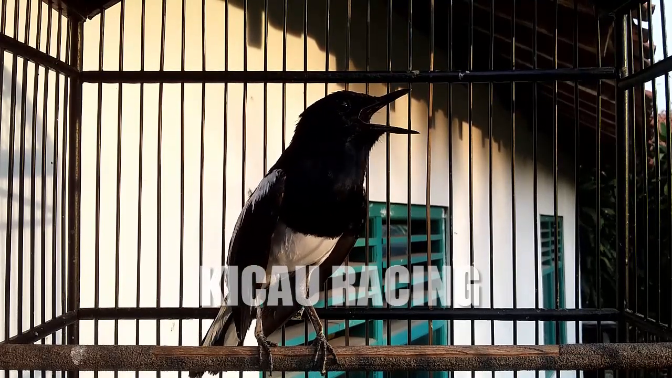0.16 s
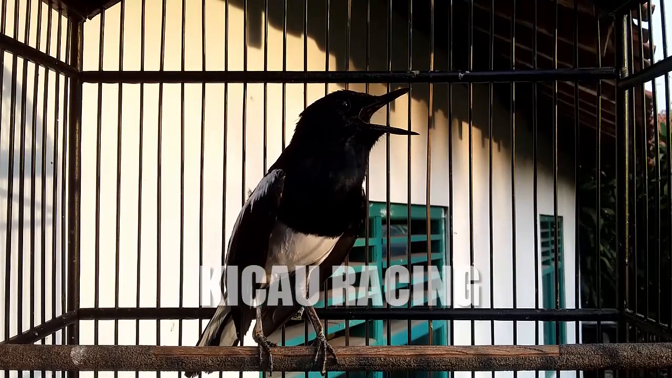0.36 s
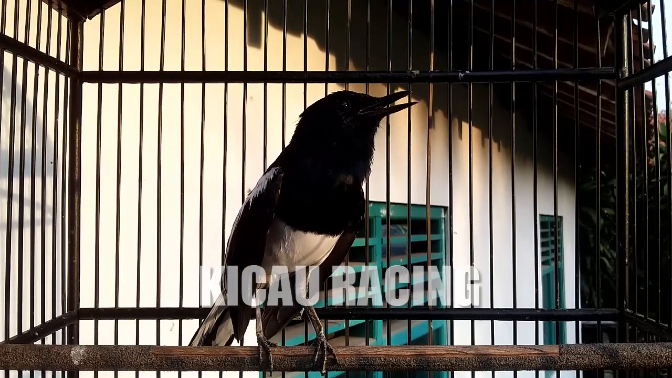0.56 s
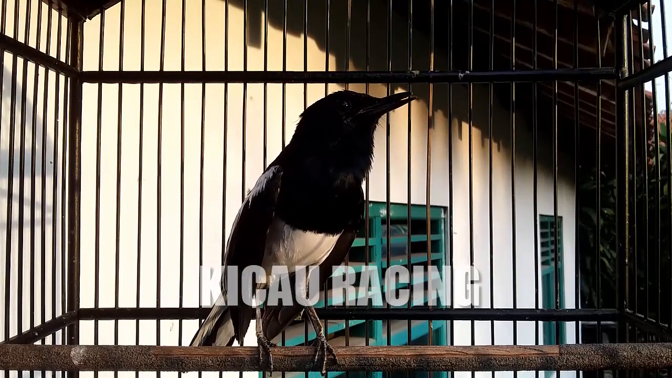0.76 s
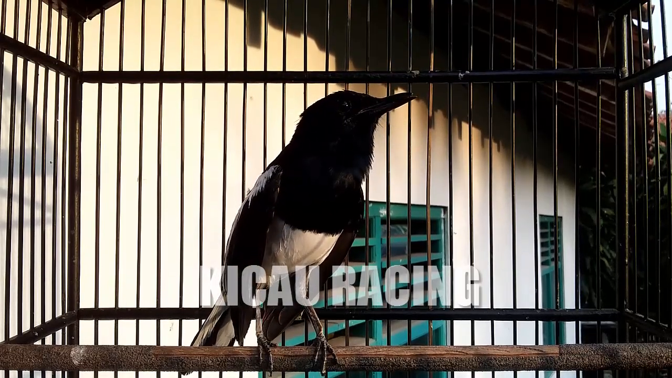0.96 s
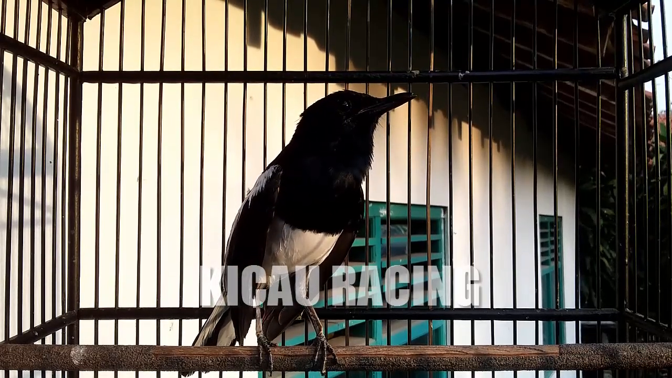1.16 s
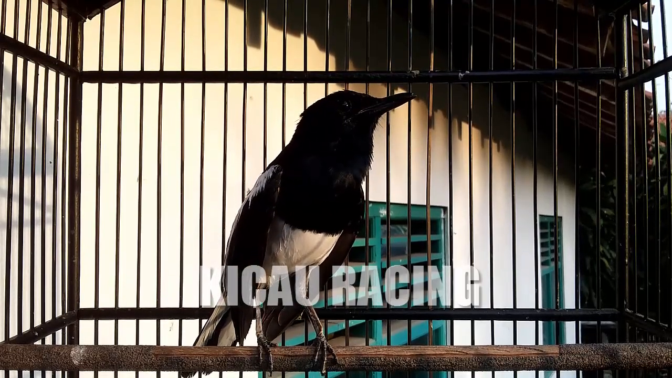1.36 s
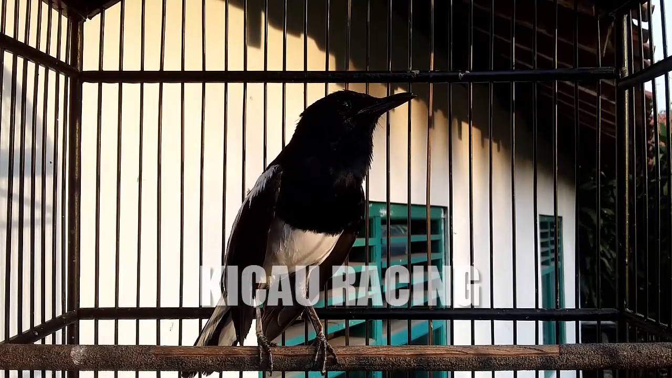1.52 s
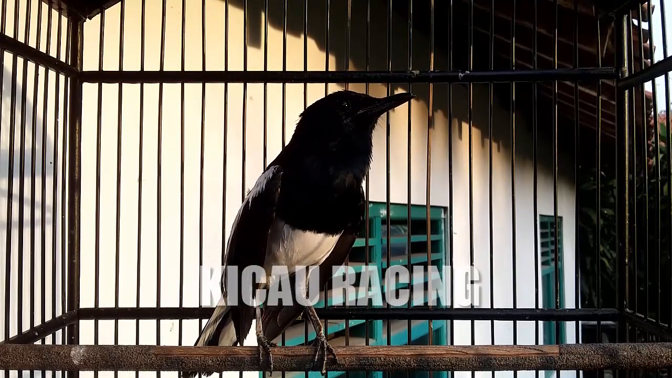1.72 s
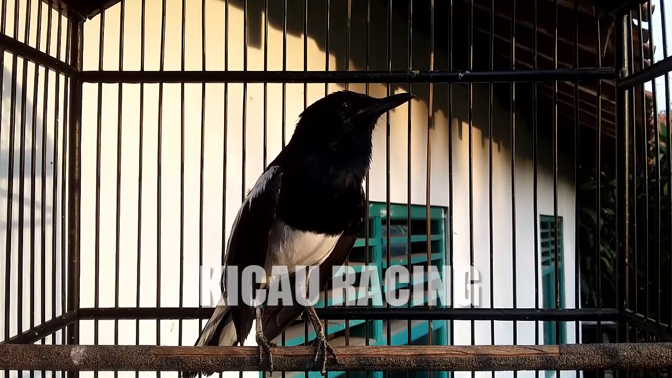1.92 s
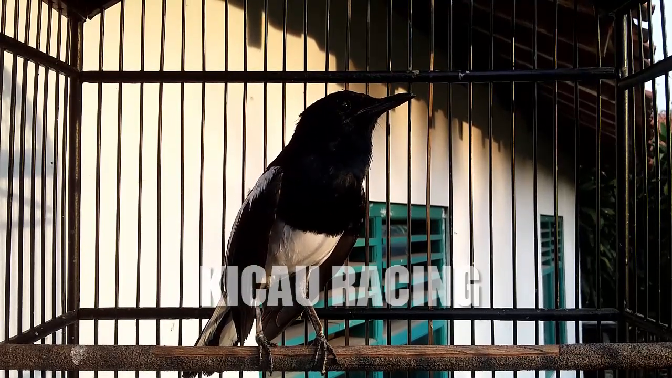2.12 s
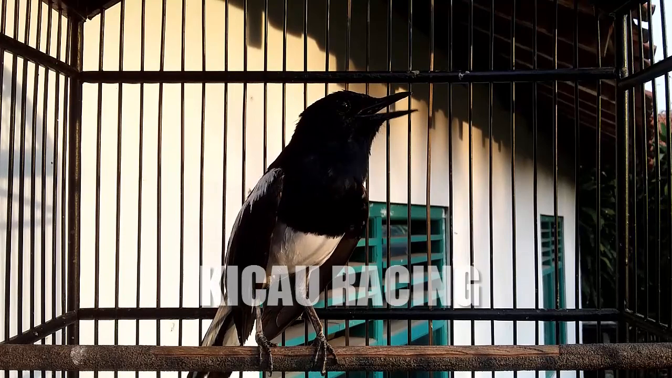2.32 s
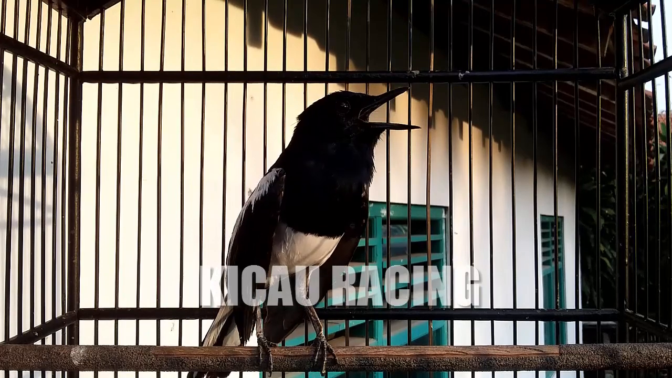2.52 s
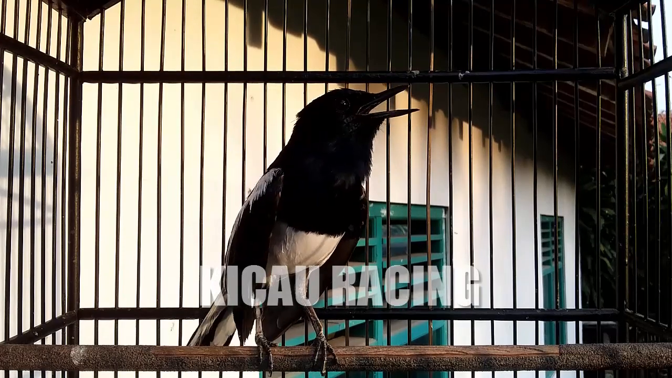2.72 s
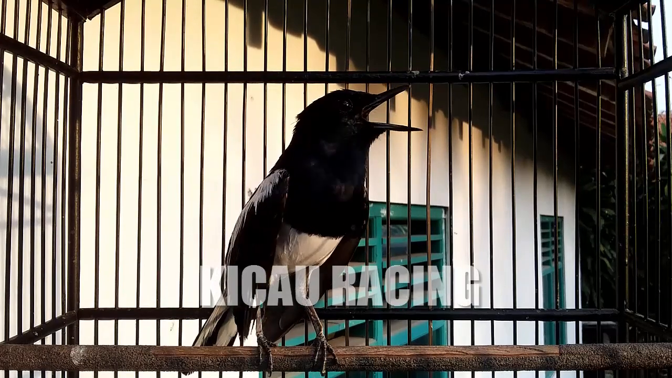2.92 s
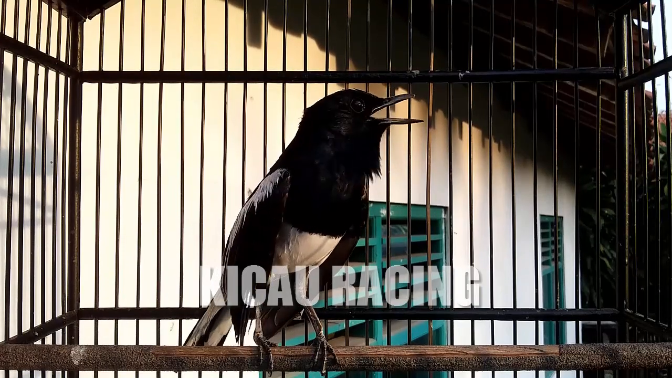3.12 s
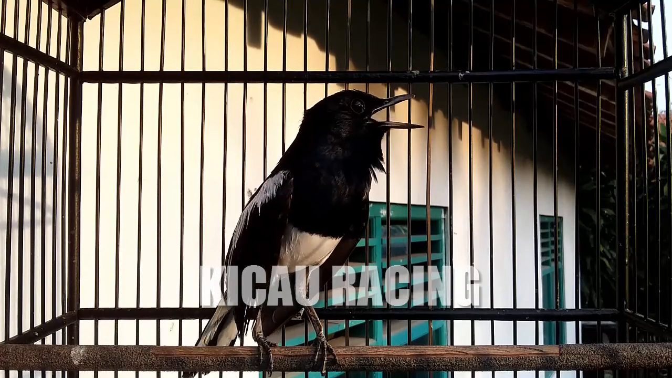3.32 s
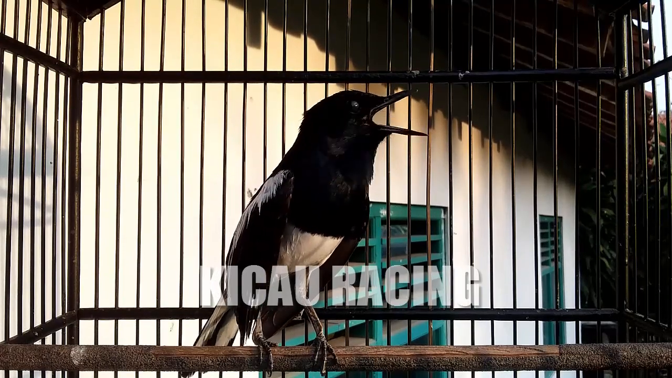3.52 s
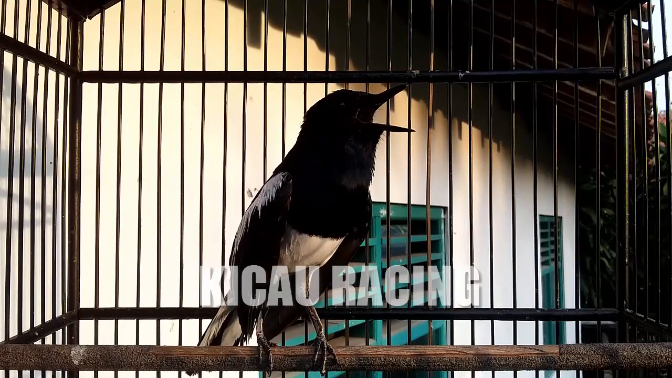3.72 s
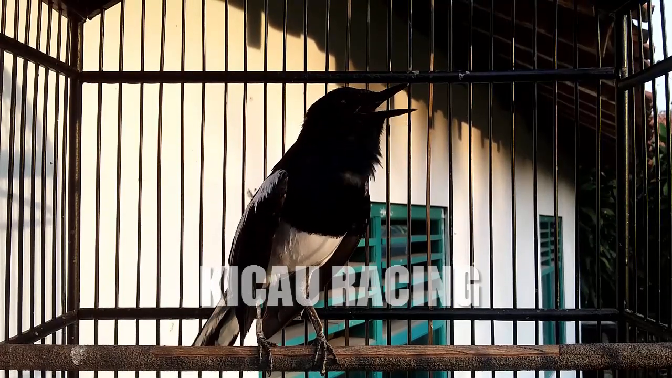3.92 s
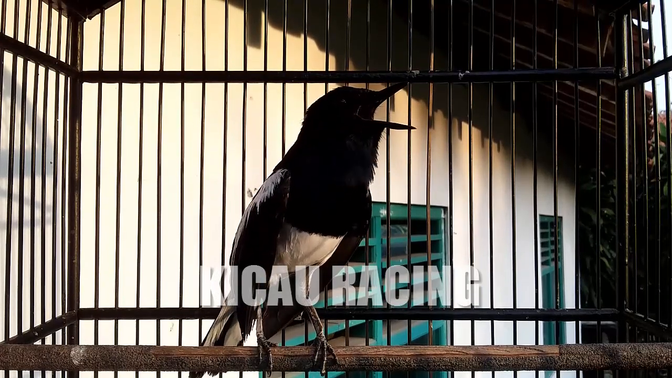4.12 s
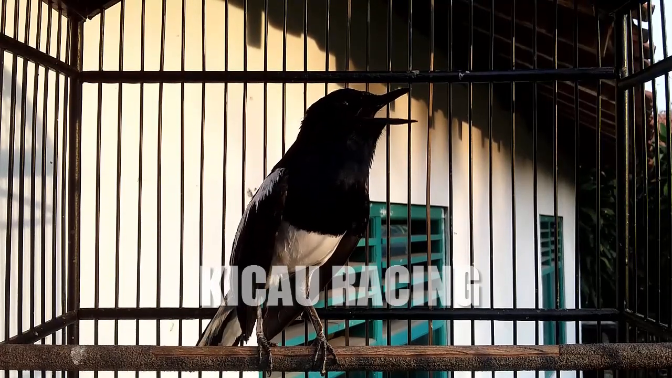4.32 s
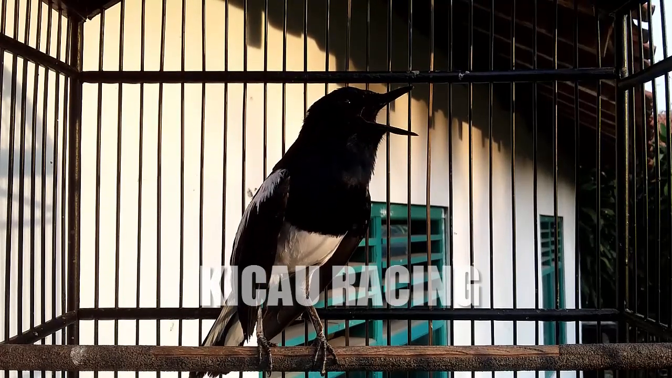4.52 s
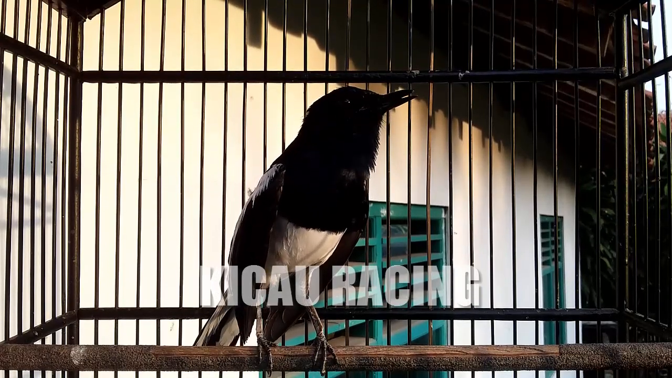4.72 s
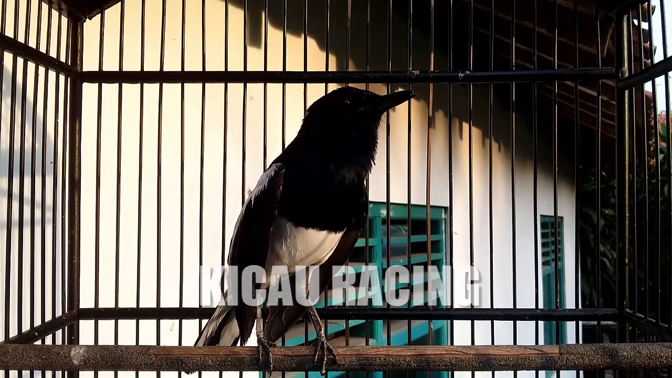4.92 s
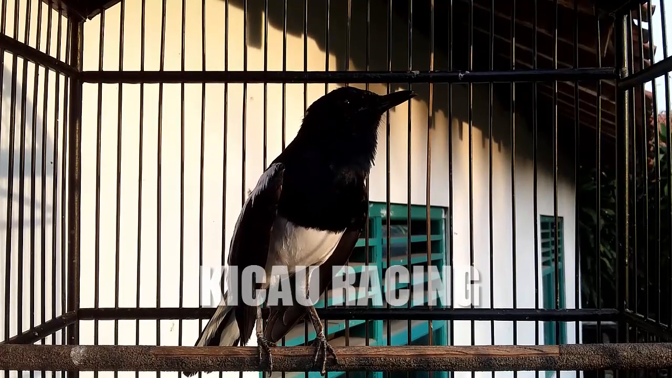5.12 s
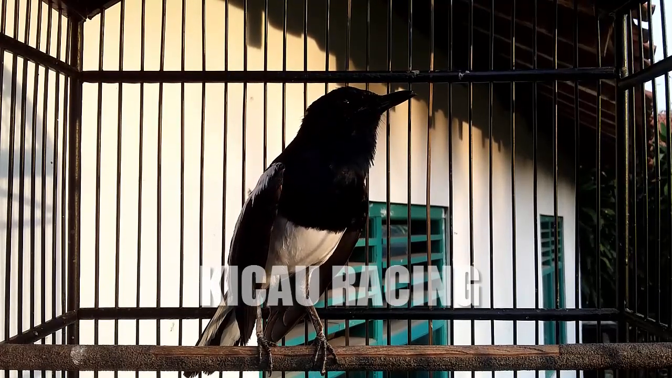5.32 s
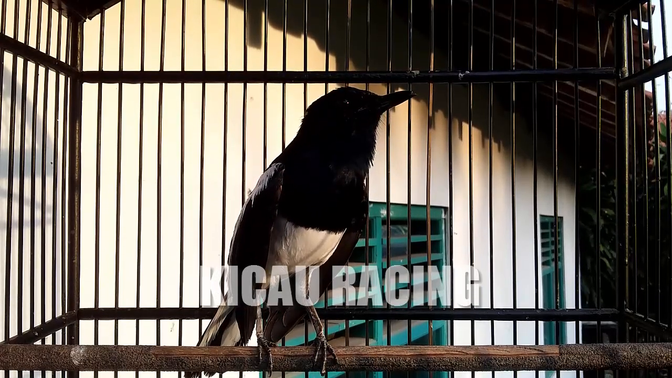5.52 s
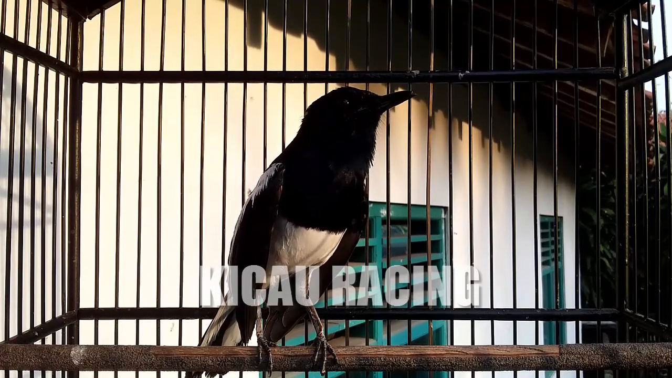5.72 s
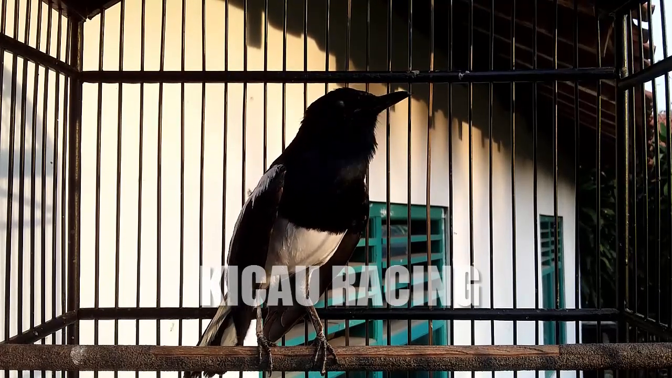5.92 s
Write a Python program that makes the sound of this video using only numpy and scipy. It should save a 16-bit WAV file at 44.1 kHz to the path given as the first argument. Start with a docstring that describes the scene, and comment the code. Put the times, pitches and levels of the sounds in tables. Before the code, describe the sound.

A caged songbird close to the microphone opens with a loud reedy warble sliding downward and a quick up-and-down chirp. Two seconds of near silence follow, with faint rumble, thin hiss and a distant whistle. Then it sings a rising whistle, a raspy trill, a low flicking chuckle and clear whistles, repeats the warble and chirp, and stops. Two faint dull bumps follow from the perch area.

```python
"""A yard between house walls: a caged magpie-robin sings loud, fast phrases close to the microphone.
The two sides of its syrinx (voice organ) sound alone or together, as gliding tones with overtones.
Throat and beak favour overtones near 3.5-5 kHz, and the walls answer. Another bird whistles far off,
over filtered noise for the outdoor rumble and hiss, with two soft bumps.
The recorder limits the peaks and drops samples, which adds faint mirror tones."""
import sys
import numpy as np
from scipy import signal
from scipy.fft import rfft, irfft, next_fast_len
from scipy.io import wavfile
from scipy.ndimage import uniform_filter1d, minimum_filter1d, map_coordinates

SR = 44100
rng = np.random.default_rng(int(sys.argv[2]) if len(sys.argv) > 2 else 0)


def transcribe(u):
    """Save the signal u as a 16-bit wav file named by the first command-line argument.

    u: samples, shape (n,) or (channels, n), limited to [-1, 1]; the rate is SR.
    q: integer samples, one column per channel.
    """
    v = np.clip(np.atleast_2d(u).T, -1, 1)
    q = np.round(v * 32767).astype(np.int16)
    wavfile.write(sys.argv[1], SR, q)


N = 267246  # length of the scene in samples

# Shared rule for soft ends: loss in dB, drop in pitch (share), extra rasp as a note fades
EDGE_DB, EDGE_SAG, FADE_RASP = 18.5, .04, .26
# Uneven strength of the fast glides: size in dB, random points a second
FLUTTER_DB, FLUTTER_HZ = 2.2, 170

# A rough, soft note at the start, the end of a phrase dying away: [t/s, f/Hz, level/dB, rasp 0-1]
OPENING_NOTE = [(0, 3080, -20, 0.42), (.018, 3150, -27.5, 0.52), (.026, 3400, -35.5, 0.6),
                (.08, 3420, -38.5, 0.6)]
# The warble, sung twice: [t/s, length/s, release/s, level/dB]
WARBLE_TIMES = [(0.079, .291, 0.016, -.5), (4.171, .325, .03, -0.36)]
# The up-and-down chirp, sung twice: [t/s, pitch ratio, level/dB]
CHIRP_TIMES = [(.46, 1.0, -.5), (4.597, 1.012, 0)]
# Whistled notes: [t/s, length/s, first f/Hz, middle f/Hz, last f/Hz, level/dB, attack/s, release/s, rasp 0-1]
WHISTLED_NOTES = [(2.51, .029, 4360, 3000, 3250, -11, .002, 0.022, .3),
                  (2.534, .296, 3396, 3683, 3771, -5.5, .05, .018, 0.02),
                  (3.466, 0.085, 3358, 3178, 3233, -11, .026, 0.031, .03),
                  (3.65, 0.037, 4080, 5000, 5250, -7.5, .006, .034, 0),
                  (3.673, .079, 4112, 4461, 4370, -4.2, .012, .033, 0),
                  (3.806, 0.12, 3787, 4152, 3860, -4.4, .04, .042, .03),
                  (3.996, .112, 3894, 3470, 2900, -6.3, .04, .1, .02)]
# Tiny pips just before a note or at its soft onset: [t/s, f/Hz, level/dB]
TINY_PIPS = [(2.931, 3170, -36), (3.279, 3030, -33), (3.809, 4780, -24)]
# A whistle that breaks into a rasp: [t/s, f/Hz, level/dB, rasp 0-1]
RASPING_WHISTLE = [(2.948, 3200, -24, .2), (2.96, 3390, -8, 0.07), (2.98, 3460, -6, 0),
                   (3.008, 3050, -8, .45), (3.044, 2760, -13, 1), (3.061, 3500, -12.5, .45)]


def magpie_robin():
    """The near bird's whole song: its low syllables are reedy, most of its high whistles almost pure."""
    song = glide(OPENING_NOTE, overtone_db=-33.5, swing_hz=151.4, scatter_hz=416.5)
    song += sum(warble(*row) for row in WARBLE_TIMES)
    song += sum(chirp(*row) for row in CHIRP_TIMES)
    song += sum(note(row, overtone_db=-19.0) for row in WHISTLED_NOTES)
    song += sum(pip(*row) for row in TINY_PIPS)
    song += glide(RASPING_WHISTLE, overtone_db=-18, buzz_hz=188.0, swing_hz=430, shake_db=5.5, scatter_hz=240)
    return song + trill() + chuckle()


# Reedy upslurs that open the warble, t from its start, level before the warble's own:
# [t/s, length/s, first f/Hz, middle f/Hz, last f/Hz, level/dB, attack/s, release/s, rasp 0-1]
WARBLE_UPSLURS = [(0, .06, 1780, 2389, 3180, -14.5, 0.018, .052, .12),
                  (.002, 0.027, 1355, 1640, 1980, -20, 0.0081, .022, .1)]
# The slide down in a chain of arches, t from the warble's start:
# [t/s, crest f/Hz, dip between crests/Hz, effort/dB]
WARBLE_ARCHES = [(.022, 3600, 150, -30), (.035, 4250, 150, -9.5), (.06, 4560, 160, -9.5),
                 (.076, 4260, 180, -6), (.103, 4170, 450, -2.3), (.114, 4100, 620, -11),
                 (.18, 3840, 680, -8.5), (.198, 3480, 560, -16), (.262, 2880, 500, -22),
                 (.269, 2560, 250, -11.7), (.325, 2130, 150, -15)]
# Arches a second, time of a crest in s, softening in the dips
ARCH_RATE_HZ, ARCH_CREST_S, DIP_DB_PER_HZ = 26, .061, .008


def warble(start, length, release, db):
    """Two reedy upslurs, then one voice that steps down in round arches with sharp dips between them."""
    slurs = sum(note(row, start, overtone_db=-3.5, buzz_hz=470, swing_hz=300) for row in WARBLE_UPSLURS)
    t, (crest, depth, effort) = curves(WARBLE_ARCHES)
    dip = depth * (1 - np.abs(np.cos(np.pi * ARCH_RATE_HZ * (t - ARCH_CREST_S))))
    fading = ease(length - t, release)
    pitch = (crest - dip) * (1 - EDGE_SAG * fading)
    level = effort - DIP_DB_PER_HZ * dip - EDGE_DB * fading
    level += FLUTTER_DB * wobble(FLUTTER_HZ, len(t))
    rasp = .25 * ease(t - t[0], .07) + FADE_RASP * fading
    sung = t < length
    slide = syllable(start + t[0], pitch[sung], level[sung], rasp[sung], overtone_db=-4.5)
    return amp(db) * (slide + slurs)


# The chirp's reedy rise, scratchy and then clearer, t from its start, f before the pitch ratio,
# level before the chirp's own:
# [t/s, length/s, first f/Hz, middle f/Hz, last f/Hz, level/dB, attack/s, release/s, rasp 0-1]
CHIRP_UPSLURS = [(0, 0.041, 1992, 2188, 2710, -11, .03, .012, .35),
                 (.033, .048, 2655, 3340, 2880, -20.5, .005, .01, .12)]
# The chirp's fall, on the same terms: [t/s, f/Hz, level/dB]
CHIRP_DOWNSLUR = [(.062, 6000, -36), (.081, 5350, -19), (.091, 4560, -8), (.104, 4160, -4),
                  (.118, 3930, -13), (.137, 3770, -12.5), (.153, 3690, -14), (.173, 3630, -33)]
# The other side joins a little lower: time in the chirp, first and last gap in pitch, level against the fall
BEAT_JOIN_S, BEAT_FROM_HZ, BEAT_TO_HZ, BEAT_DB = .108, 70, 210, -1.5


def chirp(start, ratio, db):
    """One side rises, reedy; the other falls from above until the two sides beat, ever faster."""
    rise = sum(note(row, start, ratio, overtone_db=0, buzz_hz=474, swing_hz=300) for row in CHIRP_UPSLURS)
    t, (pitch, level) = curves(CHIRP_DOWNSLUR)
    level = level + FLUTTER_DB * wobble(FLUTTER_HZ, len(t))
    both = t > BEAT_JOIN_S
    # slight rasp until the second voice joins
    fall = syllable(start + t[0], ratio * pitch, level, .2 * ~both, overtone_db=-22)
    lower = ratio * pitch[both] - np.linspace(BEAT_FROM_HZ, BEAT_TO_HZ, both.sum())
    joining = EDGE_DB * ease(t[both] - BEAT_JOIN_S, .01)
    fall += syllable(start + BEAT_JOIN_S, lower, level[both] + BEAT_DB - joining, 0, overtone_db=-21.5)
    return amp(db) * (rise + fall)


def pip(start, hz, db):
    """A 7 ms tone of steady pitch with a trace of rasp."""
    return syllable(start, hz * np.ones_like(clock(.007)), db, .1, overtone_db=-18.5)


# The rasp runs on into a trill that climbs and settles on a high whistle
TRILL_START_S, TRILL_LENGTH_S, TRILL_RELEASE_S, TRILL_DB = 3.06, 0.14, .024, -8.7
TRILL_FROM_HZ, TRILL_TO_HZ, TRILL_CLIMB_S = 3680, 5000, .08
TRILL_RATE_HZ, TRILL_SWING_HZ, TRILL_SETTLE_S, TRILL_SHAKE_DB = 85, 450, .055, 5.5
# Random unsteadiness of pitch (share) and level; extra rasp at the start
TRILL_WAVER, TRILL_WAVER_DB, TRILL_RASP = .011, 2.6, .3


def trill():
    """A fast shake of pitch and strength dies out as the note climbs."""
    t = clock(TRILL_LENGTH_S)
    shake = np.cos(2 * np.pi * TRILL_RATE_HZ * t) * np.exp(-(t / TRILL_SETTLE_S) ** 4)
    climb = ease(t, TRILL_CLIMB_S)
    pitch = TRILL_TO_HZ + (TRILL_FROM_HZ - TRILL_TO_HZ) * climb + TRILL_SWING_HZ * shake
    ends = 4 * ease(t, 0.026) + EDGE_DB * ease(TRILL_LENGTH_S - t, TRILL_RELEASE_S)
    waver = wobble(60, len(t))
    db = TRILL_DB - TRILL_SHAKE_DB * shake - ends - TRILL_WAVER_DB * waver
    rasp = .03 + TRILL_RASP * climb
    return syllable(TRILL_START_S, pitch * (1 + TRILL_WAVER * waver), db, rasp, overtone_db=-19)


# The chuckle sinks low and comes back up: [t/s, f/Hz, effort/dB]
CHUCKLE_CURVE = [(3.294, 3080, -16.5), (3.308, 3050, -13.5), (3.315, 3000, -9), (3.335, 1980, -10.5),
                 (3.366, 1970, -11.5), (3.393, 1740, -17), (3.41, 1820, -11.5), (3.426, 3850, -13.5),
                 (3.442, 3520, -8.5), (3.468, 3300, -21.5)]
# Quick upward flicks of its pitch: [t/s, rise/Hz, half width/s, lift/dB]
PITCH_FLICKS = [(3.32, 2245, .0055, -5.5), (3.351, 716, .004, 6), (3.375, 677, .004, 4.5),
                (3.424, 905, .003, -1), (3.432, 648, .004, 1)]
# How far its level follows the throat resonance; rasp on each flick
CHUCKLE_THROAT_SHARE, FLICK_RASP = 0.55, 0.19


def chuckle():
    """A low note with quick upward flicks; its level partly follows the throat resonance."""
    t, (pitch, effort) = curves(CHUCKLE_CURVE)
    s, rise, width, lift = np.transpose(PITCH_FLICKS)
    flicks = np.exp(-((t[:, None] - s) / width) ** 2)
    pitch = pitch + flicks @ rise
    db = effort + flicks @ lift + CHUCKLE_THROAT_SHARE * along(THROAT_AND_BEAK, pitch)
    return syllable(t[0], pitch, db, FLICK_RASP * flicks.sum(axis=1), overtone_db=-29)


def note(row, phrase_s=0, ratio=1, **timbre):
    """An arc of pitch through three points, under an attack, a hold and a release."""
    s, length, first, middle, last, db, attack, release, rasp = row
    t = clock(length)
    arc = np.polyval(np.polyfit([0, .5, 1], [first, middle, last], 2), t / length)
    fading = ease(length - t, release)
    edge = ease(t, attack) + fading
    pitch = ratio * arc * (1 - EDGE_SAG * edge)
    return syllable(phrase_s + s, pitch, db - EDGE_DB * edge, rasp + FADE_RASP * fading, **timbre)


def glide(rows, **timbre):
    """A syllable that follows a short curve of pitch, level and rasp."""
    t, (pitch, db, rasp) = curves(rows)
    return syllable(t[0], pitch, db, rasp, **timbre)


# How throat and open beak weigh each frequency: [f/Hz, gain/dB]
THROAT_AND_BEAK = [(1300, -35), (1900, -20), (2400, -16.5), (3000, -11.5), (3600, 2.5), (4700, 3.5),
                   (5300, -7.5), (6000, -19.5), (6700, -24), (8000, -28.5), (14000, -44.5)]


def syllable(start, pitch, db, rasp, overtone_db, buzz_hz=330, swing_hz=400, shake_db=7, scatter_hz=170):
    """One side of the syrinx: a gliding tone whose harmonics light up as they cross the throat resonance."""
    size = len(pitch)
    rasp = np.clip(rasp, 0, 1)
    pitch = uniform_filter1d(pitch, SR // 300, mode="nearest")  # the muscles round every turn
    # rasp: a slower, uneven vibration shakes both pitch and strength
    buzz = 2 * np.pi * np.cumsum(buzz_hz * (1 + .22 * wobble(150, size))) / SR
    shaken = swing_hz * np.sin(buzz) + scatter_hz * wobble(700, size)
    pitch = pitch * (1 + 0.0019 * wobble(120, size)) + rasp * shaken
    db = db + shake_db * rasp * (np.cos(buzz) - .5)
    phase = 2 * np.pi * np.cumsum(pitch) / SR + rng.uniform(0, 2 * np.pi)
    k = np.arange(1, 5)[:, None]  # harmonic number
    gains = amp(overtone_db * (k - 1) + along(THROAT_AND_BEAK, np.abs(k * pitch))) * (k * pitch < SR / 2)
    harmonics = np.sum(gains * np.sin(k * phase), axis=0)
    tone = harmonics / np.sqrt(np.sum(gains ** 2, axis=0) / 2 + 1e-20)  # even power; db sets the level
    return placed(amp(db) * tone, int(start * SR))


def interference(x):
    """A narrow null at 3847 Hz, 75 Hz wide: glides that cross it dip for an instant and flutter afterwards."""
    return signal.lfilter(*signal.iirnotch(3847, 3847 / 75, SR), x)


# Echoes from the cage and the house: [delay t/s, level/dB]
WALL_ECHOES = [(.00323, -16.5), (.0125, -15.5), (.021, -24), (.037, -25), (.116, -37)]


def walls(x):
    """Distinct echoes; against a glide they beat."""
    return sum(amp(db) * np.pad(x, (int(delay * SR), 0))[:N] for delay, db in WALL_ECHOES)


# How long the yard rings, as the time to fall by 60 dB: [f/Hz, t/s]
YARD_DECAY = [(300, 0.35), (2500, 0.47), (4000, 0.61), (8000, 0.4), (15000, 0.098)]


def yard(x, build=0.045):
    """Diffuse reverberation: shaped noise that builds up, then dies at its own speed at each frequency."""
    hz, t, z = signal.stft(rng.standard_normal(SR), SR, nperseg=256)
    decay = amp(-60 * t / along(YARD_DECAY, hz)[:, None])
    tail = signal.istft(z * decay * (1 - np.exp(-t / build)), SR, nperseg=256)[1]
    return signal.fftconvolve(x, tail / np.linalg.norm(tail))[:N]


# Soft bumps, as of feet on the perch: [t/s, starting level/dB]
PERCH_BUMPS = [(4.54, -33), (4.88, -43.5)]


def perch(decay=0.035, corner_hz=230):
    """Each bump is a short, dull thud: low noise that falls by 60 dB in the decay time (s)."""
    t = np.arange(SR // 8) / SR
    sos = signal.butter(2, [70, corner_hz], "band", fs=SR, output="sos")

    def thud():
        return unit(signal.sosfilt(sos, rng.standard_normal(len(t)))) * amp(-60 * t / decay)
    return sum(placed(amp(db) * thud(), int(s * SR)) for s, db in PERCH_BUMPS)


# Another bird holds a whistle, then lets it drop:
# [t/s, hold/s, f/Hz mid-hold, fullest level/dB, level at the drop/dB]
FAR_WHISTLES = [(.94, .65, 2747, -56, -63), (3.3, .66, 2847, -53, -50)]
# A faint, low, wavering call far away: [t/s, f/Hz, level/dB]
FAR_LOW_CALL = [(1.71, 480, -69), (1.8, 452, -64), (1.88, 410, -69), (1.96, 412, -64), (2.06, 445, -65),
                (2.16, 425, -63), (2.24, 402, -65), (2.32, 415, -67)]
FAR_SWELL_S, FAR_DROP_S, FAR_DROP_HZ_PER_S, FAR_RISE_HZ_PER_S = .36, .125, 5700, 60


def far_sounds():
    """The low wavering call and the other bird's whistles."""
    t, (pitch, db) = curves(FAR_LOW_CALL)
    return far_call(t[0], pitch, db, waver=.012) + sum(far_whistle(*row) for row in FAR_WHISTLES)


def far_whistle(start, hold, hz, full_db, drop_db):
    """It swells, creeps up in pitch and ends in a fading downslur."""
    t = clock(hold + FAR_DROP_S)
    pitch = hz + FAR_RISE_HZ_PER_S * (t - hold / 2) - FAR_DROP_HZ_PER_S * np.maximum(t - hold, 0)
    edge = ease(t, FAR_SWELL_S) + ease(t[::-1], .04)
    db = np.interp(t, [FAR_SWELL_S, hold], [full_db, drop_db]) - EDGE_DB * edge
    return far_call(start, pitch, db, waver=.0015)


def far_call(start, pitch, db, waver):
    """A plain sine tone from far away, slightly unsteady in pitch and level."""
    size = len(pitch)
    phase = 2 * np.pi * np.cumsum(pitch * (1 + waver * wobble(50, size))) / SR
    strength = np.sqrt(2) * amp(db + 1.7 * wobble(25, size))
    return placed(strength * np.sin(phase), int(start * SR), fade=.015)


# Outdoor background: [t/s, rumble level/dB, hiss level/dB]
AIR_LEVELS = [(0, -54.5, -66), (1.4, -59.5, -64.5), (1.46, -62.5, -73), (1.75, -63, -69), (2.0, -60, -68.5),
              (2.5, -54.5, -61.5), (4.8, -57.5, -64.5), (5.2, -60, -65.5), (5.4, -58, -63.5),
              (5.56, -59, -63.5), (5.61, -64.5, -73.5), (5.85, -65, -70.5), (6.06, -61.5, -68)]
# Tone colour of the rumble: [f/Hz, relative level/dB]
RUMBLE_SPECTRUM = [(18, -43), (30, -17), (48, -1), (102, -3), (156, -5.5), (468, -11), (501, -19),
                   (552, -14.5), (800, -22.5), (1040, -45.5), (1760, -120)]
# Tone colour of the hiss: [f/Hz, relative level/dB]
HISS_SPECTRUM = [(410, -31), (700, -9.5), (852, -4), (922, -3), (1080, -6), (1680, -7), (2660, -11),
                 (4800, -5), (6650, -22), (9730, -28), (14600, -26.5), (15400, -26), (16000, -49.5)]


def background():
    """A low outdoor rumble and a thin hiss, both filtered noise, that sink and return."""
    s, rumble_db, hiss_db = np.transpose(AIR_LEVELS)
    t = np.arange(N) / SR

    def noise(spectrum):
        return unit(filtered(rng.standard_normal(N), lambda hz: amp(along(spectrum, hz))))
    rumble = amp(np.interp(t, s, rumble_db) + 1.4 * wobble(34, N)) * noise(RUMBLE_SPECTRUM)
    return rumble + amp(np.interp(t, s, hiss_db)) * noise(HISS_SPECTRUM)


def amp(db):
    """Decibels to gain."""
    return 10 ** (np.asarray(db) / 20)


def unit(x):
    """Scale to rms 1."""
    return x / np.sqrt(np.mean(x ** 2) + 1e-20)


def along(points, hz):
    """(Hz, value) points read on a log axis."""
    f, v = np.transpose(points)
    return np.interp(np.log(hz + 1), np.log(f + 1), v)


def curves(rows):
    """Times over the span of the rows, and each column per sample."""
    s, *cols = np.transpose(rows)
    t = np.arange(max(int(s.min() * SR), 0), min(int(s.max() * SR), N)) / SR
    return t, [np.interp(t, s, c) for c in cols]


def clock(length):
    """Sample times from 0 to length."""
    return np.arange(int(length * SR)) / SR


def ease(t, span):
    """Falls from 1 at t = 0 and lands softly on 0 at t = span."""
    return np.clip(1 - t / span, 0, 1) ** 2


def wobble(rate, size):
    """A smooth random curve, rate knots a second."""
    knots = rng.standard_normal(int(size * rate / SR) + 4)
    return map_coordinates(knots, [np.arange(size) * rate / SR])


def filtered(x, response):
    """x times a response of frequency."""
    m = next_fast_len(N + 8192)
    return irfft(rfft(x, m) * response(np.fft.rfftfreq(m, 1 / SR)), m)[:N]


def placed(sound, start, fade=0.0014):
    """A sound with soft ends (fade in s), set on the full time line."""
    t = np.arange(len(sound)) / SR
    edge = np.clip(np.minimum(t, t[::-1]) / fade, 0, 1)
    return np.pad(sound * np.sin(edge * np.pi / 2) ** 2, (start, N - start - len(sound)))


def scene():
    """The near bird is almost dry, the far sounds are wetter."""
    song = magpie_robin()
    far = far_sounds()
    near = interference(song + walls(song)) + perch()
    reverberation = yard(amp(-32) * song + amp(-13) * far)
    return (near + far + reverberation + background())[None]


def limiter(x):
    """Turns the gain down for a few milliseconds around each peak above -0.8 dB."""
    need = np.minimum(1, amp(-.8) / (np.abs(x) + 1e-9))
    return x * uniform_filter1d(minimum_filter1d(need, SR // 150), SR // 300)


def drop_samples(x, slip=0.51):
    """48 kHz brought to 44.1 kHz by skipping samples: each tone gets images at multiples of 3.9 kHz from it."""
    fast = np.pad(signal.resample_poly(x, 160, 147), (0, 8))
    n = np.arange(N)
    # the skipping restarts a little off in every 941-sample buffer, which ticks and roughens the images
    offset = slip * rng.random(N)[n // 941]
    return fast[(n * 160 / 147 + offset).astype(int)]


def record(dry):
    """Limiter, crude rate conversion, then nothing from 16 kHz up."""
    return filtered(drop_samples(limiter(dry[0])), lambda hz: hz < 16000)[None]


dry = scene()
out = record(dry)
transcribe(out)
```